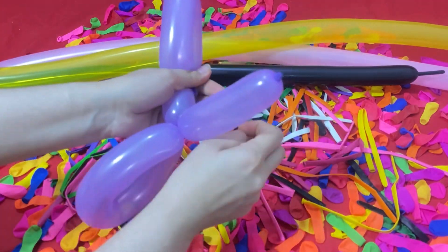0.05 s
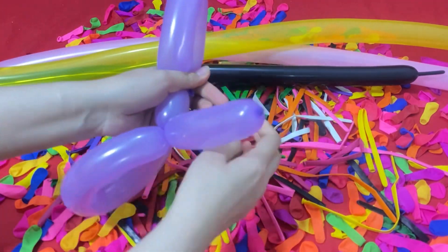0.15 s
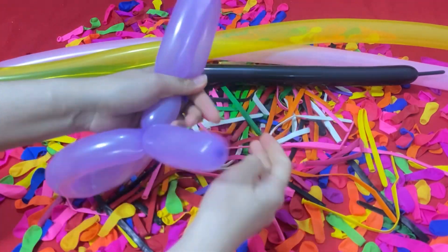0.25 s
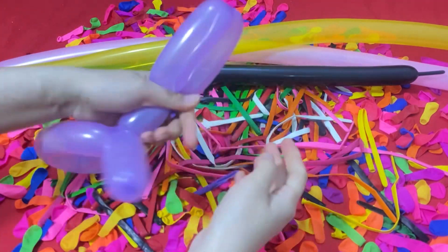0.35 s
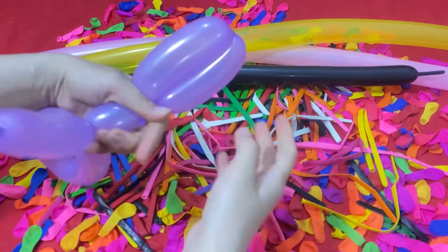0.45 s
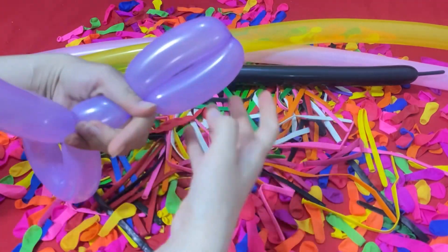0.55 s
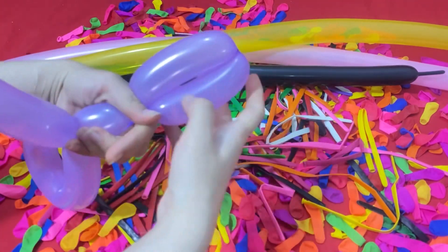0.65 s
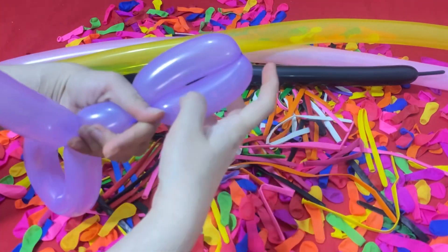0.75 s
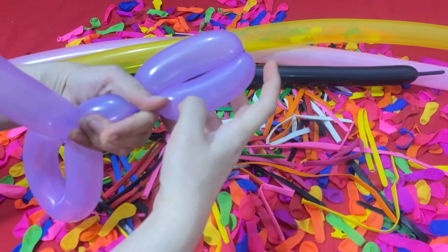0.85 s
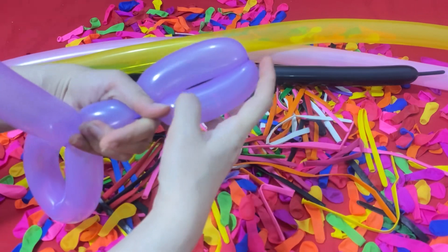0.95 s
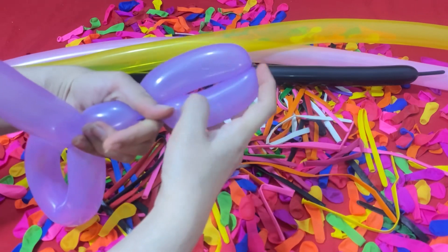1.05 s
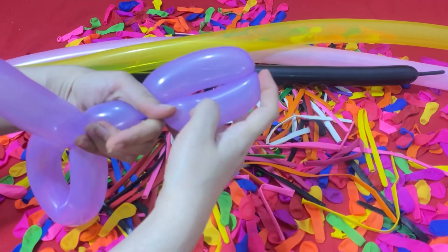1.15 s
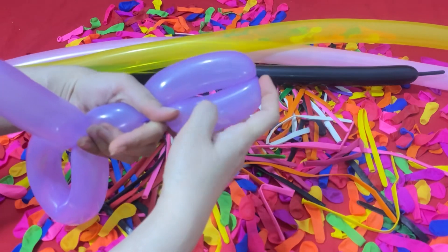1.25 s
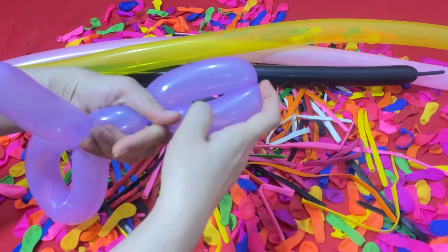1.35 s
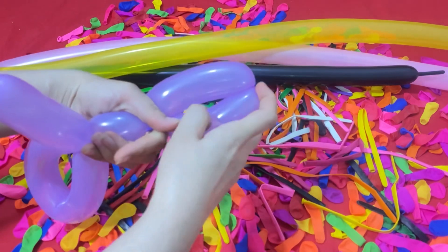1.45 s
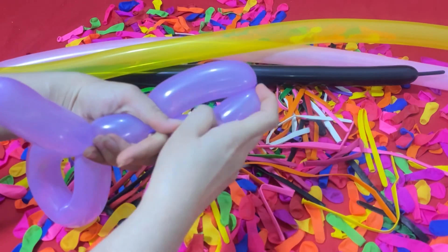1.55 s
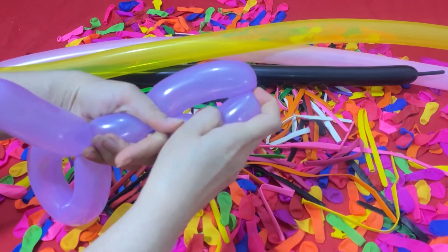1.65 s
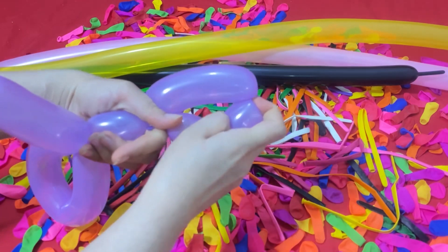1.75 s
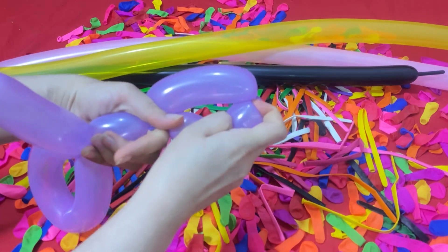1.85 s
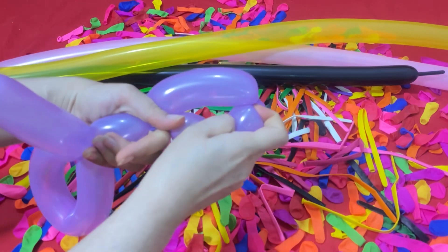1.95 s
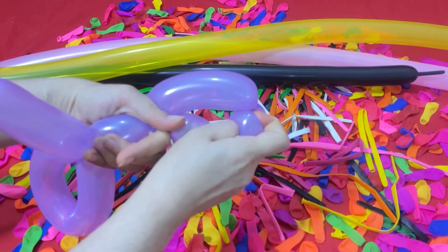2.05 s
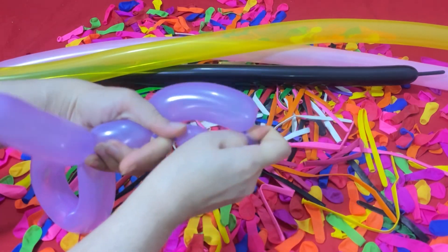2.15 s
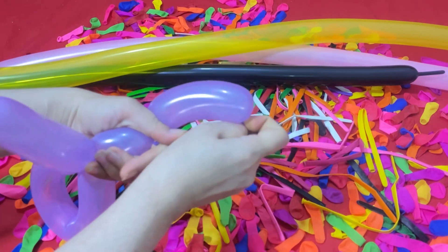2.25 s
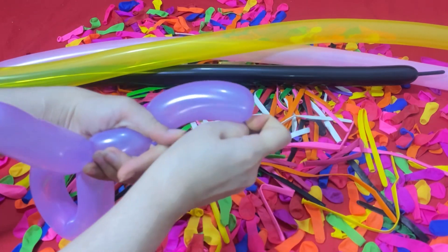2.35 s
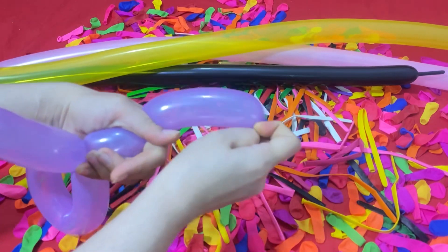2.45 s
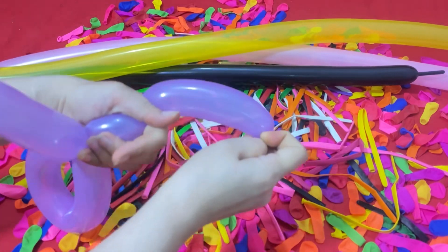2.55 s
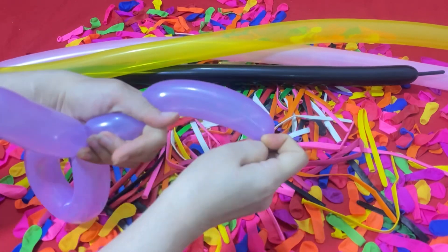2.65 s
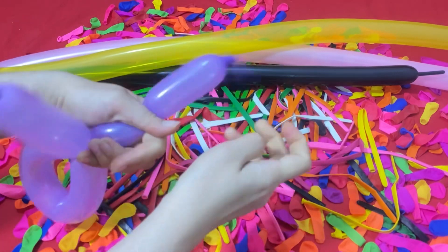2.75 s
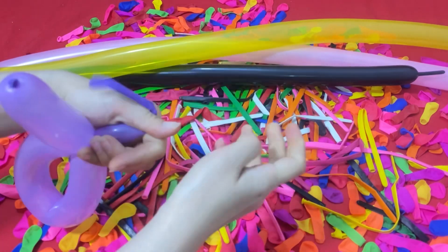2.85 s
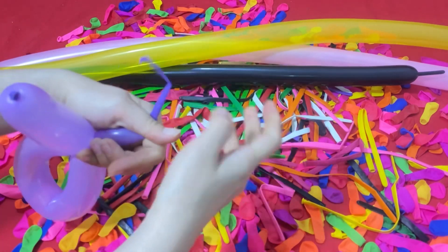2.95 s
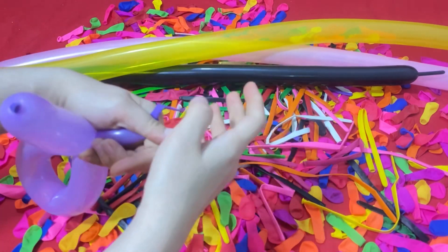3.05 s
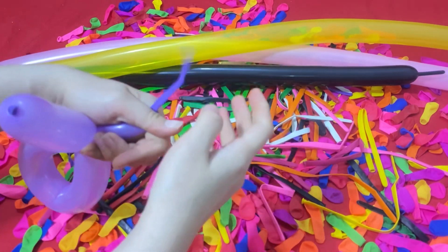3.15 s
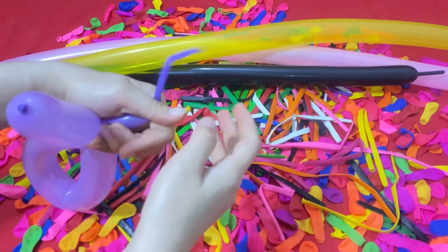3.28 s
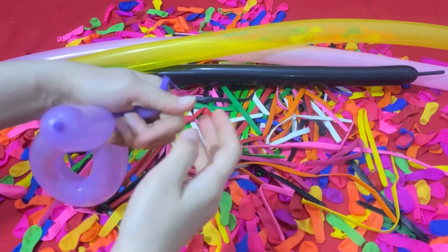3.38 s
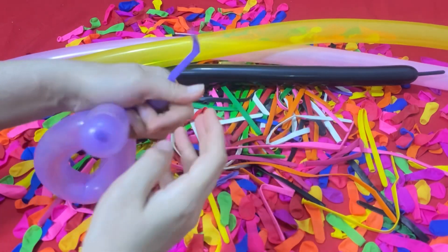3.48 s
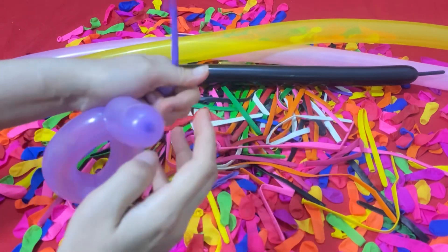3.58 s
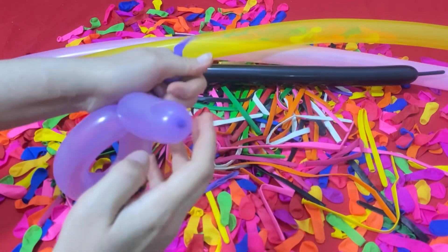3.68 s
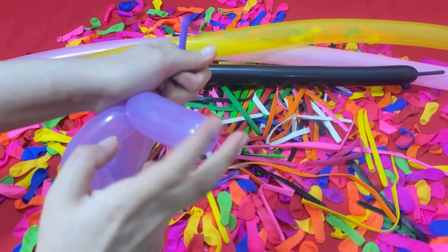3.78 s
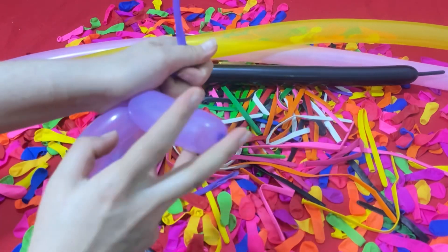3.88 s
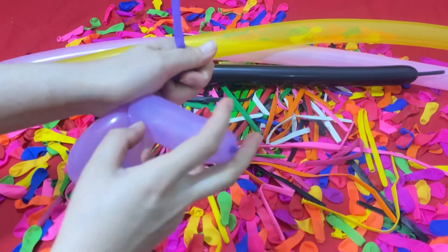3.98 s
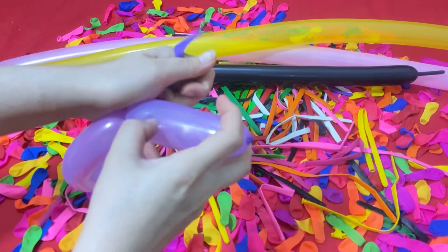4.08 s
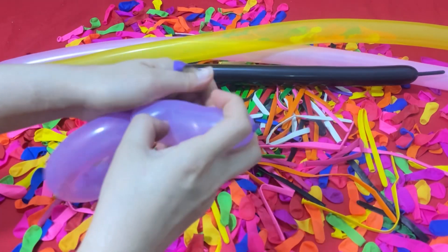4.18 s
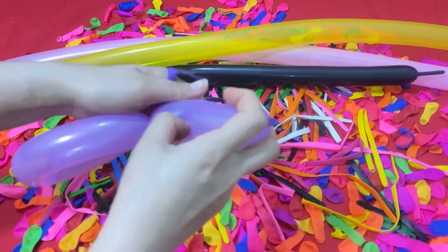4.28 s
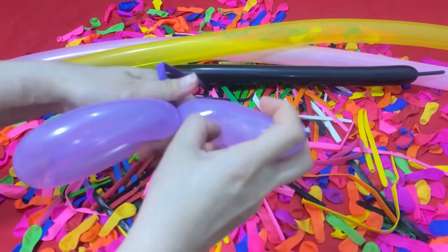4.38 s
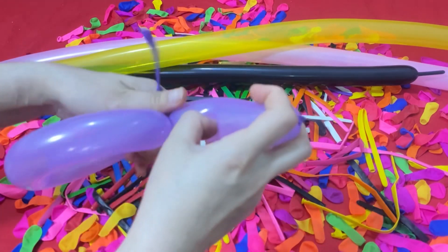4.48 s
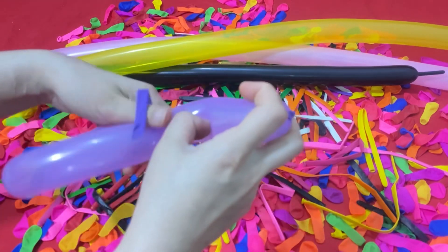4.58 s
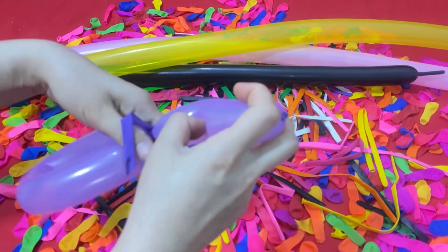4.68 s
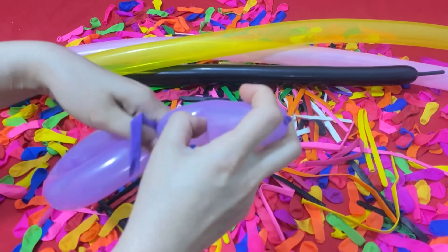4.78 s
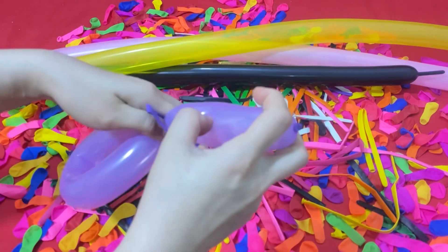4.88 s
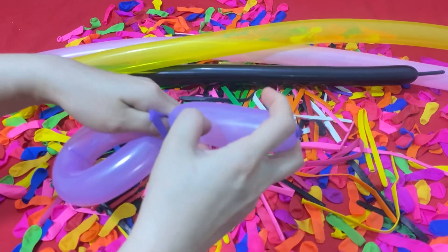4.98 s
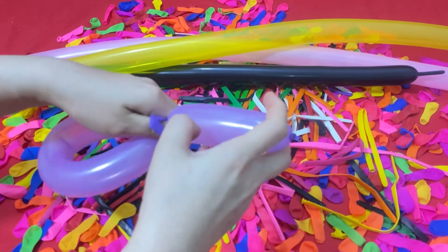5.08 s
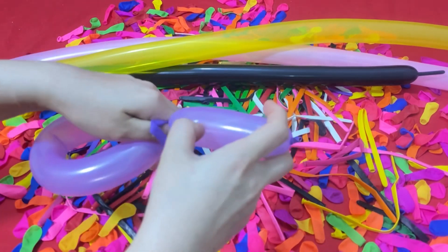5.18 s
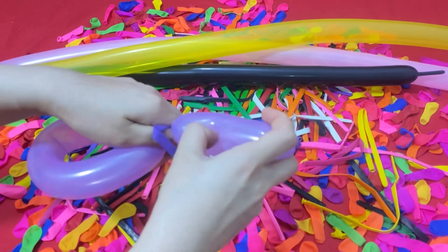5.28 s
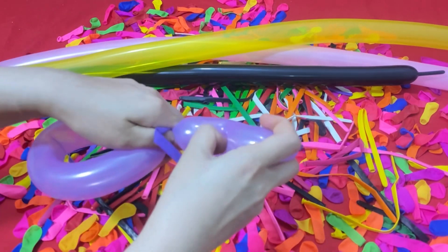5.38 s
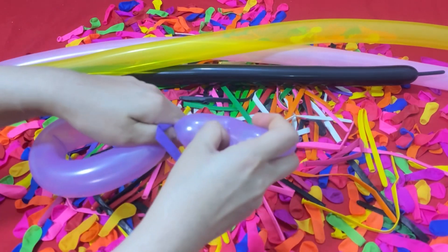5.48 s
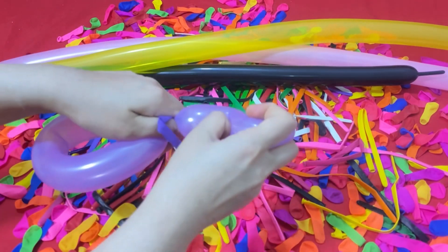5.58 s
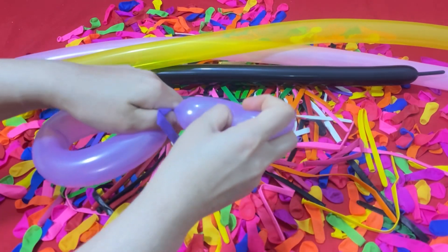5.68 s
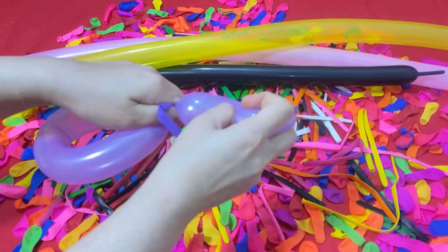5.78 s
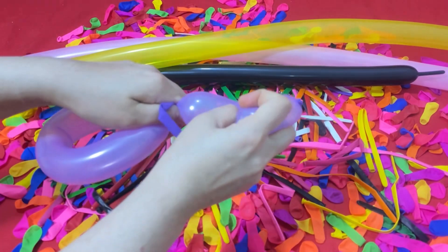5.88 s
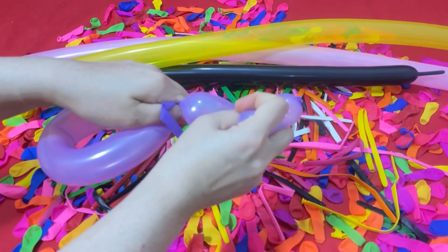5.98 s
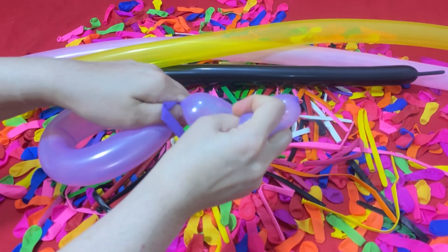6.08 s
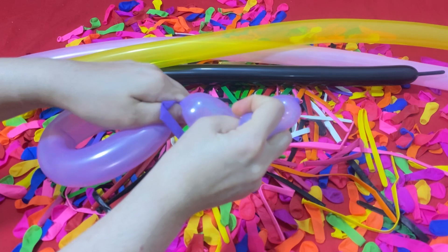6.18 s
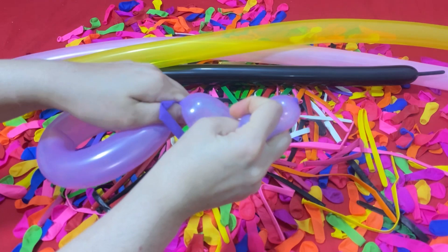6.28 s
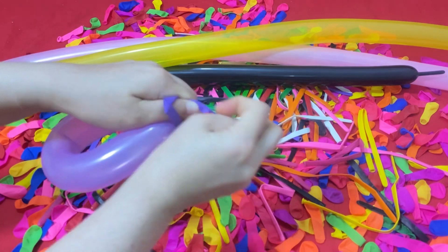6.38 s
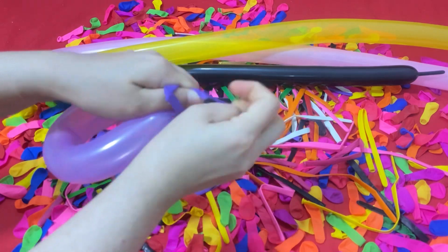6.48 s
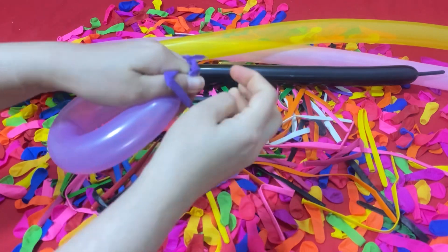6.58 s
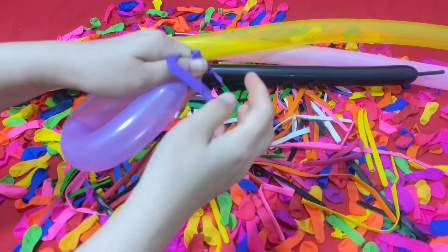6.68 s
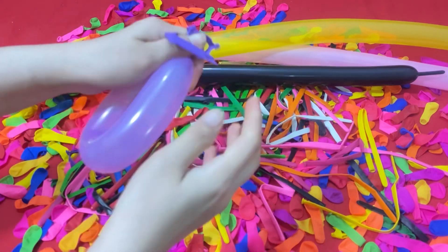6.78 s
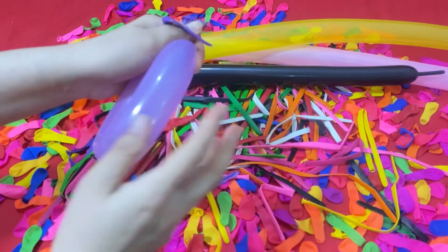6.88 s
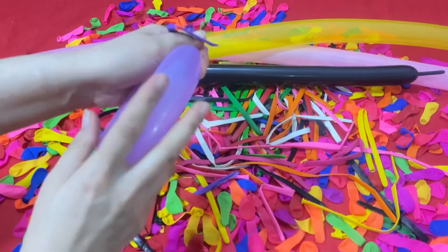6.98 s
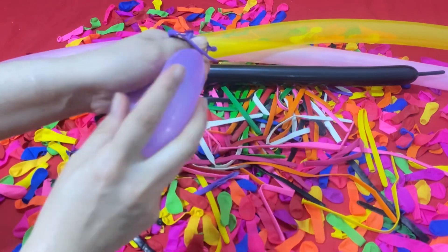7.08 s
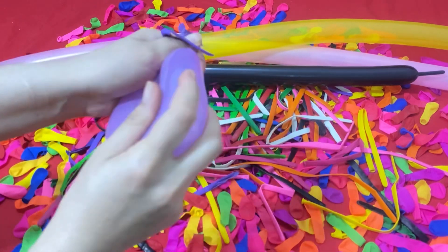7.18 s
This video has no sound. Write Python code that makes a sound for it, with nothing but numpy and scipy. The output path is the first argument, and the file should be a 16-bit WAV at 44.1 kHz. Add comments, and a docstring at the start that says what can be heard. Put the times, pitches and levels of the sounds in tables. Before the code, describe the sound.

A balloon pop's echo fades in a bare room, then fingers creak and snap on latex, air rushes out, and one segment bursts loudly.

```python
"""A pop is dying away in a bare, echoing room, then hands squeeze a twisted latex balloon close by.
Fingers stick and slip on the rubber: each slip rings the skin's modes, giving creaks and snaps.
Shaped noise makes the brushing, the bumps and the escaping air; a jerked neck twangs as a set of tones.
One segment tears and blows its air out; another bursts with a bang that ducks the recorder's gain.
The room answers with a fading noise tail."""
import sys
import numpy as np
from scipy import signal
from scipy.fft import rfft, irfft, next_fast_len
from scipy.io import wavfile
from scipy.ndimage import uniform_filter1d, minimum_filter1d

SR = 44100
rng = np.random.default_rng(int(sys.argv[2]) if len(sys.argv) > 2 else 0)


def to_wav(s):
    """Save 16-bit WAV."""
    ch = np.atleast_2d(s).T  # columns
    pcm = np.round(np.clip(ch, -1, 1) * 32767)  # PCM
    wavfile.write(sys.argv[1], SR, pcm.astype(np.int16))


N = 319284
T = np.arange(N) / SR  # time, s


def amp(db):
    """Turns decibels into gain."""
    return 10 ** (np.asarray(db) / 20)


def unit(x):
    """Scales a sound to rms 1."""
    return x / np.sqrt(np.mean(x ** 2) + 1e-20)


def read(points, hz):
    """Reads between the points of a table, on a log-frequency axis."""
    f, value = np.transpose(points)
    return np.interp(np.log(hz + 1), np.log(f + 1), value)


def colour(x, points):
    """Filters a sound by a table of f/Hz, level/dB."""
    length = x.shape[-1]
    size = next_fast_len(length + 2048)
    gain = amp(read(points, np.fft.rfftfreq(size, 1 / SR)))
    return irfft(rfft(x, size) * gain, size)[..., :length]


def noise(points, clump=0):
    """Coloured noise of rms 1; clump gathers it into millisecond bursts."""
    bursts = np.exp(clump * unit(uniform_filter1d(rng.standard_normal(N), 64)))
    return unit(colour(rng.standard_normal(N) * bursts, points))


def add(mix, s, sound):
    """Adds a sound to the mix at time s."""
    part = mix[max(round(s * SR), 0):][:len(sound)]
    part += sound[:len(part)]


def gate(start, end, db, attack, release):
    """Gain over time: straight attack, hold, straight release."""
    return amp(db) * np.clip(np.minimum((T - start) / attack, (end - T) / release), 0, 1)


def resonate(x, hz, width_hz):
    """A mode that follows the curve hz; a unit click rings with height 1."""
    turn = np.exp(2j * np.pi * np.cumsum(hz * np.ones(len(x))) / SR)
    fading = signal.lfilter([1], [1, -np.exp(-np.pi * width_hz / SR)], x / turn)
    return (turn * fading).imag


# modes of the stretched skin: multiple of the skin pitch, level/dB
SKIN_MODES = [(1, -1.5), (1.42, -6.5), (2.03, -5.5), (2.6, -8.5), (3.9, -7)]


def skin(drive, hz, ring_s, damping=.7):
    """The stretched skin's modes, each a little detuned by the grip; the high ones die sooner."""
    detune = 1 + 0.031 * rng.standard_normal(len(SKIN_MODES))
    ring = 0
    for k, (ratio, db) in enumerate(SKIN_MODES):
        width_hz = 1.55 / ring_s * ratio ** damping  # the lowest mode falls 42 dB in ring_s
        ring = ring + (-1) ** k * amp(db) * resonate(drive, hz * ratio * detune[k], width_hz)
    # little radiates below the lowest mode
    return signal.lfilter(*signal.butter(2, np.mean(hz) / 2, "high", fs=SR), ring)


# the loudest single slips of the skin: t/s, skin pitch f/Hz, ring level/dB, tick level/dB before TICK_GAIN
LOUD_SLIPS = [(1.089, 950, -44.5, -53.5), (1.113, 1620, -38.5, -48.5), (1.475, 1750, -43.5, -53),
              (1.571, 1790, -37.5, -46.5), (1.739, 1800, -49, -53.5), (1.885, 1690, -44, -48),
              (2.161, 947, -32, -33.5), (2.387, 2900, -45, -41), (2.398, 1700, -35, -40),
              (2.437, 950, -31, -40), (2.465, 1100, -45, -47.5), (2.654, 1200, -45.5, -38),
              (2.753, 700, -27.5, -26), (2.813, 598, -38, -25.5), (4.089, 2300, -45.5, -42.5),
              (4.159, 1600, -24, -24.5), (4.682, 850, -35, -48), (4.715, 794, -31, -42.5),
              (4.729, 805, -31.5, -42.5), (4.984, 1550, -42, -46), (5.028, 735, -44, -53),
              (5.484, 1100, -43.5, -44), (5.576, 1540, -37.5, -52), (5.687, 1600, -42, -45),
              (5.781, 1200, -34, -44.5), (5.859, 1720, -43, -42), (6.009, 1600, -45, -46),
              (7.118, 1620, -28.5, -38.5), (7.134, 1630, -30, -38), (7.15, 1830, -27, -43),
              (7.202, 2185, -19, -31.5)]
SNAP_CYCLES, TICK_T60 = 19, .013  # ring time in cycles of the skin pitch; tick decay by 60 dB, s
TICK_GAIN = 0.61


def snaps(ripple_share=0.74, scatter=0.071):
    """Each slip flicks the skin: a bright tick, then the ring, refreshed by ripples round the tube."""
    out, t = np.zeros(N), np.arange(SR // 10) / SR
    for s, hz, ring_db, tick_db in LOUD_SLIPS + faint_slips():
        ring_s = SNAP_CYCLES / hz
        ripples, grit = rng.standard_normal((2, len(t)))
        flick = (t == 0) + scatter * ripples * amp(-60 * t / (ring_s * ripple_share))
        ring = skin(flick, hz, ring_s)
        tick = colour(grit * amp(-60 * t / TICK_T60),
                      [(200, -29.0), (1200, 2.5), (4000, 9.0), (7000, 9.5), (11000, 4.0), (16000, -9)])
        add(out, s, amp(ring_db) * ring / abs(ring).max() + TICK_GAIN * amp(tick_db) * tick)
    return out


# levels of the faint slips, dB over the brushing of their stroke (the tick before TICK_GAIN)
FAINT_RING_DB, FAINT_TICK_DB = 9, 11


def faint_slips(count=2):
    """Two weak slips at chance moments of every stroke, in the same columns as LOUD_SLIPS."""
    rows = []
    for start, end, hz, _, _, db in STROKES:
        for where in rng.random(count):
            rows.append((start + where * (end - start), hz, db + FAINT_RING_DB, db + FAINT_TICK_DB))
    return rows


# strokes of a finger over the latex; the tighter the squeeze, the higher the pitch:
# start t/s, end t/s, skin pitch at start f/Hz, at end f/Hz, creak level/dB, brush level/dB
STROKES = [(0.631, 0.979, 1310, 1700, -79, -67), (1.081, 1.504, 1498, 1910, -71, -69),
           (1.465, 1.584, 1850, 2500, -58, -63), (1.579, 2.6, 1797, 1600, -79, -73),
           (3.758, 4.123, 2190, 2700, -73, -69), (4.09, 4.17, 1904, 1700, -58, -56.5),
           (4.163, 4.404, 1700, 1900, -66, -58), (4.81, 4.89, 800, 715, -64, -60.5),
           (4.93, 5.08, 700, 560, -66.5, -66), (5.21, 5.319, 660, 759, -69, -72.5),
           (5.291, 5.501, 899, 1060, -70, -69.5), (5.455, 5.63, 1039, 1150, -55, -61),
           (5.48, 5.608, 1452, 1650, -50.5, -61.5), (5.58, 5.795, 1650, 1520, -63.5, -70),
           (5.851, 6.073, 1550, 1750, -70, -65.5), (6.12, 6.278, 1653, 1750, -74.5, -67),
           (6.87, 7.3, 1498, 1810, -62, -56.5)]
# typical slip rate at this creak level and skin pitch; it doubles every DOUBLING_DB
SLIPS_PER_S, SLIPS_AT_DB, SLIPS_AT_HZ, DOUBLING_DB = 270, -62, 1200, 20


def creaks(jitter=.8, uneven_db=6, grit_db=-19, ring_cycles=22, waver=0.056, soft_hz=700):
    """Stick and slip: an uneven train of small flicks rings the skin, whose pitch wavers with its tension."""
    out = np.zeros(N)
    for start, end, pitch, end_pitch, db, _ in STROKES:
        length = int((end - start) * SR)
        rate = SLIPS_PER_S * pitch / SLIPS_AT_HZ * 2 ** ((db - SLIPS_AT_DB) / DOUBLING_DB)
        gaps, sizes = rng.standard_normal((2, 256))
        at = (np.cumsum(np.exp(jitter * gaps)) / rate * SR).astype(int)
        inside = at < length
        slips = np.zeros(length + SR // 20)
        slips[at[inside]] = amp(uneven_db * np.minimum(sizes[inside], 1.3))
        slips[:length] *= signal.windows.tukey(length, .7)
        hiss, drift = rng.standard_normal((2, 2 * SR))[:, :len(slips)]
        # each slip leaves a puff of grit that fades over about a millisecond
        grit = signal.lfilter([1], [1, -np.exp(-1 / (0.0012 * SR))], slips) * hiss
        glide_hz = np.interp(np.arange(len(slips)), [0, length], [pitch, end_pitch])
        hz = glide_hz * np.exp(waver * unit(uniform_filter1d(drift, size=300)))
        # the fingertip softens each flick
        flicks = signal.lfilter([1], [1, -np.exp(-2 * np.pi * soft_hz / SR)], slips)
        sound = skin(flicks, hz, ring_cycles / pitch, damping=1.43) + amp(grit_db) * grit
        add(out, start, amp(db) * sound / np.sqrt(np.sum(sound ** 2) / length + 1e-12))
    return out


BRUSH_COLOUR = [(300, -6.5), (1500, 8), (3500, 3.5), (6000, -0.5), (11000, -2), (16000, -13)]  # tone of skin brushing on latex: f/Hz, level/dB
STROKE_ATTACK_S, STROKE_RELEASE_S = 0.038, 0.044


def brushing(rest_db=-84):
    """Dry skin hisses on the latex during each stroke, and faintly while the fingers rest."""
    touch = sum(gate(start, end, db, STROKE_ATTACK_S, STROKE_RELEASE_S)
                for start, end, *_, db in STROKES)
    return np.hypot(touch, amp(rest_db)) * noise(BRUSH_COLOUR, clump=0.67)


# a twisted neck jerks free and the tube twangs: t/s, level/dB
TWANG_AT = (4.306, -35)
# modes of the twang, relative to its level: f/Hz, level/dB in the blow, level/dB ringing on
TWANG_MODES = [(1290, -15, -36), (1730, -4.5, -26), (2100, -3.5, -17), (3050, -14, -29), (3520, -2.5, -24),
               (3980, -12, -20), (4900, -14.5, -38), (6900, -12, -34)]
# the tube's lowest note: settled pitch, level relative to the twang, swell time, decay by 60 dB
TUBE_HZ, TUBE_DB, TUBE_RISE_S, TUBE_T60 = 403.2, -1.5, 0.016, .25
SLACK_SHARE, SETTLE_S, SWAY_HZ = 0.37, .025, 12.1  # it starts slack, overshoots and settles


def twang(rise=0.0028, blow_t60=.026, scrape_db=-4, ring_rise=0.0084, ring_t60=0.24, waver=.026):
    """A scrape swells into fluttering skin modes; the tube's low note bends up as it tightens."""
    out, t = np.zeros(N), np.arange(SR // 2) / SR
    # the jerk has rms 1 as if spread over 50 ms
    jerk = unit((1 - np.exp(-t / rise)) ** 2 * amp(-60 * t / blow_t60)) * np.sqrt(.1)
    ring = (1 - np.exp(-t / ring_rise)) * amp(-60 * t / ring_t60)
    scrape = unit(colour(rng.standard_normal(len(t)), [(700, -18), (2000, -1), (7500, 1), (16000, -13)]))
    sound = amp(scrape_db) * jerk * scrape
    for hz, blow_db, ring_db in TWANG_MODES:
        bend, flutter = unit(uniform_filter1d(rng.standard_normal((2, len(t))), size=220))
        turns = np.cumsum(hz * (1 + waver * bend)) / SR + rng.random()
        strength = amp(blow_db) * jerk + amp(ring_db) * ring * flutter
        sound += strength * np.sin(2 * np.pi * turns)
    note_hz = TUBE_HZ * (1 - SLACK_SHARE * np.exp(-t / SETTLE_S) * np.cos(2 * np.pi * SWAY_HZ * t))
    swell = (1 - np.exp(-t / TUBE_RISE_S)) * amp(TUBE_DB - 60 * t / TUBE_T60)
    swell = swell * (1 + .5 * flutter)  # the note shares the flutter of the last mode
    sound += swell * np.sin(2 * np.pi * np.cumsum(note_hz) / SR)
    s, db = TWANG_AT
    add(out, s, amp(db) * sound)
    return out


def thump(s, db, from_hz, to_hz, fall, t60):
    """A push of air: a few swings that slow as the skin goes slack."""
    out, t = np.zeros(N), np.arange(SR // 4) / SR
    hz = to_hz + (from_hz - to_hz) * np.exp(-t / fall)
    add(out, s, amp(db - 60 * t / t60) * np.sin(2 * np.pi * np.cumsum(hz) / SR))
    return out


# the tube recoils when a grip gives way:
# t/s, level/dB, pitch at start f/Hz, at end f/Hz, decay by 60 dB t/s
RECOILS = [(2.439, -45.5, 277, 210, .04), (2.8, -36.5, 398, 100, 0.1), (3.97, -60, 300, 80, .1),
           (4.159, -42, 814, 680, 0.028), (4.308, -51.5, 110, 55, 0.16), (5.112, -57, 400, 260, 0.037)]


def recoils(fall_s=0.0079):
    """Each sudden release pushes the air with a short falling thump."""
    return sum(thump(s, db, from_hz, to_hz, fall_s, t60) for s, db, from_hz, to_hz, t60 in RECOILS)


def jet(start, end, db, attack, release, sag_db_per_s):
    """Strength of a jet of air: it follows the area of the opening and sags with the pressure."""
    return gate(start, end, 0, attack, release) ** 2 * amp(db - sag_db_per_s * np.maximum(T - start, 0))


# air past the fingers, then through the torn skin: start t/s, end t/s, level/dB before the sag
LEAK = (2.092, 2.208, -37.5)
RUSH = (2.721, 2.832, -32)
# tone of the leak, the puff and the rush: f/Hz, level/dB
LEAK_COLOUR = [(500, -22.5), (850, -13.5), (2000, -5), (4500, -7.5), (7500, -2.5), (11000, 2.5),
               (16000, -3.5)]
PUFF_COLOUR = [(90, -18), (230, -3.5), (600, 1.5), (1100, 2.5), (1700, -11), (2500, -8.5), (4000, -25)]
RUSH_COLOUR = [(35, -12), (150, 2.5), (300, 0), (700, -1.5), (2000, -2.5), (4000, -9.5), (7000, 0.5),
               (11000, -4), (16000, -16.5)]
LEAK_ATTACK_S, LEAK_RELEASE_S, RUSH_ATTACK_S, RUSH_RELEASE_S = 0.024, 0.028, 0.0085, 0.013
LEAK_SAG_DB_PER_S, RUSH_SAG_DB_PER_S = 46, 78  # the jet weakens as the pressure falls
PUFF_S, PUFF_DB, PUFF_T60 = 2.437, -37, 0.07  # a pocket of air lets go at once
FLAP_HZ, FLAP_DB = 81.8, 2  # the torn skin flaps in the rush of air


def escaping_air():
    """A thin hiss past the fingers, a dull puff, then a full rush through the torn, flapping skin."""
    leak_jet = jet(*LEAK, LEAK_ATTACK_S, LEAK_RELEASE_S, LEAK_SAG_DB_PER_S)
    leak = leak_jet * noise(LEAK_COLOUR, clump=.15)
    puff_fade = (T > PUFF_S) * amp(PUFF_DB - 60 * abs(T - PUFF_S) / PUFF_T60)
    puff = puff_fade * noise(PUFF_COLOUR)
    rush_jet = jet(*RUSH, RUSH_ATTACK_S, RUSH_RELEASE_S, RUSH_SAG_DB_PER_S)
    rush = rush_jet * noise(RUSH_COLOUR, clump=0.29)
    flap = amp(-FLAP_DB * np.cos(2 * np.pi * FLAP_HZ * (T - RUSH[0])))
    return leak + puff + rush * flap


BANG_COLOUR = [(40, -12), (120, -8), (280, 0), (500, -9), (800, 1.5), (1500, -4), (3100, -3.5), (6000, -4),
               (11000, -11.5), (16000, -23)]  # tone of the bang: f/Hz, level/dB
# a rip races along the skin, ever louder, until the segment flies open; then the rags sound
RIP_S, BURST_S, BURST_DB, RIP_DB_PER_S = 6.326, 6.346, -4, 1470
OPEN_S, RAGS_S, RAGS_DB, BURST_RAMP_S = 0.0049, 0.0204, -19, 0.0021


def bang():
    """The rip grows steadily in dB up to the burst and stops short, leaving brief noise from the rags."""
    growth_db = BURST_DB - RIP_DB_PER_S * np.maximum(BURST_S - T, 0)
    rip = gate(RIP_S, BURST_S + OPEN_S, growth_db, BURST_RAMP_S, BURST_RAMP_S)
    rags = gate(BURST_S, BURST_S + RAGS_S, RAGS_DB, BURST_RAMP_S, BURST_RAMP_S)
    return np.maximum(rip, rags) * noise(BANG_COLOUR, clump=0.19)


def blast():
    """The burst's freed air gives one strong low thump."""
    return thump(6.345, db=0.5, from_hz=374, to_hz=63, fall=0.0036, t60=0.054)


# the hands shift their grip and bump the tube: start t/s, end t/s, level/dB
HANDLING = [(0, 1.16, -75), (1.092, 2.045, -69.5), (2.5, 3.548, -76.5), (3.854, 6.35, -77)]
HANDLING_COLOUR = [(25, -15), (55, 1), (100, 1.5), (140, -13.5), (200, 5), (380, -4.5), (600, -6),
                   (1500, -21)]  # tone of the bumps: f/Hz, level/dB
GRIP_RAMP_S = 0.11


def bumping():
    """Dull, low noise from the tube while the grip shifts."""
    return sum(gate(*grip, GRIP_RAMP_S, GRIP_RAMP_S) for grip in HANDLING) * noise(HANDLING_COLOUR)


# treble lift of the right channel; the left is lowered by as much: f/Hz, level/dB
RIGHT_LIFT = [(1200, 0), (3500, 1.5), (5800, 3.5), (7000, -0.5)]


def near(x, scatter_db=-7, scatter_t60=0.024, count=4):
    """The bright direct path, reaching the right first, and quick scatter from several paths.

    The paths slowly swing in strength, so no one path colours the sound."""
    x = colour(x, [(3000, -0.5), (6500, -2), (11500, 5)])
    t = np.arange(SR // 25) / SR
    paths = rng.standard_normal((count, 2, len(t))) * amp(-60 * t / scatter_t60) * (t > .001)
    paths /= np.linalg.norm(paths, axis=2, keepdims=True)
    # each path swings at its own speed: 1, 2, 3 and 4 Hz
    swing = np.cos(2 * np.pi * np.outer(np.arange(1, count + 1), T)) * np.sqrt(2 / count)
    scatter = sum(signal.oaconvolve((x * share)[None], path, axes=1)[:, :N]
                  for share, path in zip(swing, paths))
    left = np.roll(colour(x, [(hz, -db) for hz, db in RIGHT_LIFT]), 2)  # two samples later
    direct = np.array([left, colour(x, RIGHT_LIFT)])
    return direct + amp(scatter_db) * colour(scatter, [(150, -15.5), (700, 0.5)])


ROOM_T60 = [(60, 0.57), (220, 1.49), (700, 1.5), (1600, 1.334), (3200, 1.198), (6000, 0.9), (11000, 0.57),
            (16000, 0.37)]  # time for the echo to fall 60 dB: f/Hz, t/s
ROOM_COLOUR = [(40, -9), (130, -9), (230, -2), (480, -1.5), (900, -1.5), (3000, -1), (6000, -4), (12000, 1)]  # tone of the echo: f/Hz, level/dB
ROOM_ALIKE = [(100, 0.91), (250, 0.89), (500, 0.43), (950, 0.018), (1900, 0.34), (3800, 0.24), (7000, .1)]  # how alike left and right are: f/Hz, likeness (1 = the same)


def room_response(build=0.015):
    """A diffuse tail for each microphone, alike in the bass, each band dying at its own speed."""
    hz, t, (a, b) = signal.stft(rng.standard_normal((2, 2 * SR)), SR, nperseg=512)
    alike = np.clip(read(ROOM_ALIKE, hz), -1, 1)[:, None]
    mid, side = np.sqrt(1 + alike) * a, np.sqrt(1 - alike) * b
    fade = amp(read(ROOM_COLOUR, hz)[:, None] - 60 * t / read(ROOM_T60, hz)[:, None])
    tail = signal.istft(np.array([mid + side, mid - side]) * fade, SR, nperseg=512)[1]
    tail = tail * (1 - np.exp(-np.arange(tail.shape[1]) / SR / build))
    return tail / np.sqrt(np.sum(tail ** 2) / 2)


def pop_ring(room, s, db, points, right_db):
    """A burst is so brief that the room answers with its own response, in the colour of the burst."""
    tail = colour(room, points)
    tail = amp(db) * tail / np.sqrt(np.mean(tail[:, :SR // 10] ** 2))
    out = np.zeros((2, N))
    skipped = max(-round(s * SR), 0)  # the part that rang before the start
    for channel, gain in enumerate([1, amp(right_db)]):
        add(out[channel], s, gain * tail[channel, skipped:])
    return out


# tone that each burst gives the room's ring, a moment before the start and at the last bang:
# f/Hz, level/dB
EARLIER_COLOUR = [(90, -22.5), (220, -9), (700, -5.5), (1200, -2.5), (1650, 4), (2600, -6.5), (4500, -9.5),
                  (7000, -16.5), (12000, -18.5)]
LAST_COLOUR = [(40, -14), (280, -5.5), (500, -11), (800, -1.5), (1500, -4.5), (3400, 1), (5500, -6),
               (11000, -6.5), (16000, -18.5)]


def burst_rings(room):
    """The room rings on after an earlier pop and after the last burst."""
    earlier = pop_ring(room, -.15, db=-14.0, points=EARLIER_COLOUR, right_db=-1)
    last = pop_ring(room, 6.344, db=-14.5, points=LAST_COLOUR, right_db=1.2)
    return earlier + last


FLOOR_COLOUR = [(30, -5.5), (200, 6.5), (600, -8), (8000, -16), (16000, -32.5)]  # tone of the background noise: f/Hz, level/dB


def noise_floor(db=-83):
    """Steady background noise, separate in each channel."""
    return amp(db) * np.array([noise(FLOOR_COLOUR), noise(FLOOR_COLOUR)])


SHARED_HZ, IN_PHASE_HZ, PORT_DELAY_S = 6400, 11150, .000204


def shared_treble(x):
    """Stereo only below the treble: above it both channels carry one microphone, the right a little later."""
    left, right = rfft(x)
    hz = np.fft.rfftfreq(N, 1 / SR)
    share = 1 / (1 + (SHARED_HZ / (hz + 1)) ** 20)
    late = left * np.exp(-2j * np.pi * (hz - IN_PHASE_HZ) * PORT_DELAY_S)
    return irfft(np.array([left, np.sqrt(1 - share) * right + np.sqrt(share) * late]), N)


def scene(room_db=-10, room_right_db=0.0):
    """Rubber, air and bang, heard directly and through the room."""
    room = room_response()
    rubber = snaps() + creaks() + twang() + brushing() + escaping_air() + recoils()
    echo = signal.fftconvolve(rubber[None], room, axes=1)[:, :N]
    echo = amp(room_db) * echo * amp([[0], [room_right_db]])
    direct = near(rubber + bang() + blast() + bumping())
    return direct + echo + burst_rings(room) + noise_floor()


MICROPHONE = [(8000, 0), (11000, -5), (13700, -10.5), (15600, -7.5), (16200, -14.5)]  # treble response of the microphone: f/Hz, level/dB
EDGE_HZ = 16200  # upper band limit


def record(dry, limit_db=-14, hold_s=.15, recover_db_per_s=66, start_duck_db=16):
    """Microphone colour, a limiter that clamps at once, holds and recovers, then the band limit."""
    x = colour(shared_treble(dry), MICROPHONE)
    power_db = 10 * np.log10(abs(uniform_filter1d((x ** 2).mean(0), size=128)) + 1e-12)
    half = int(hold_s * SR / 2)
    # the worst overshoot of the last hold_s seconds
    over_db = -minimum_filter1d(np.minimum(limit_db - power_db, 0), 2 * half + 1, origin=half)
    recovery = recover_db_per_s * T
    # the gain is still down at the start
    duck_db = np.maximum.accumulate(np.maximum(over_db + recovery, start_duck_db)) - recovery
    low_pass = signal.firwin(401, EDGE_HZ, window=("kaiser", 8), fs=SR)
    return signal.oaconvolve(x * amp(-duck_db), low_pass[None], "same", axes=1)


dry = scene()
out = record(dry)
to_wav(out)
```